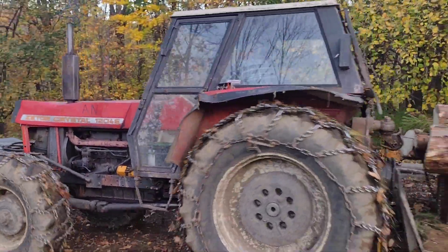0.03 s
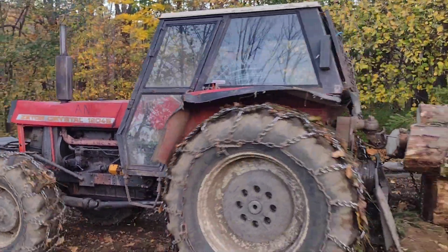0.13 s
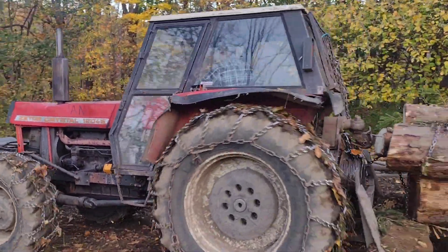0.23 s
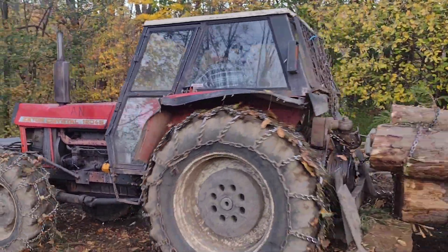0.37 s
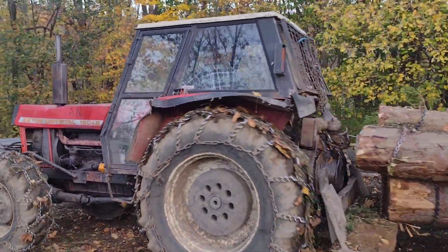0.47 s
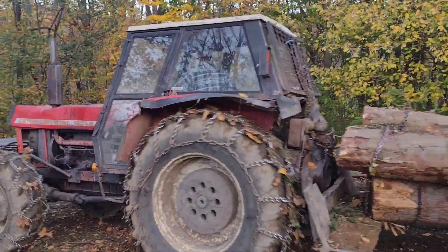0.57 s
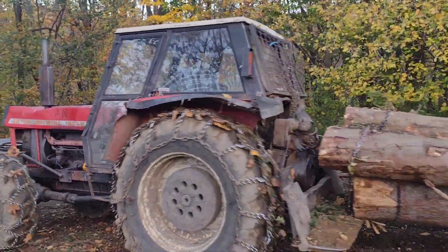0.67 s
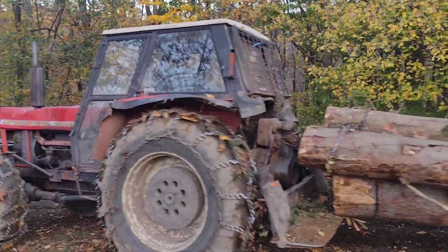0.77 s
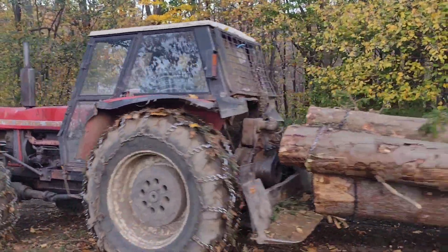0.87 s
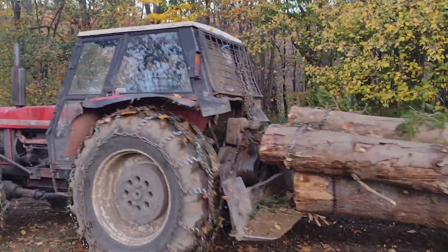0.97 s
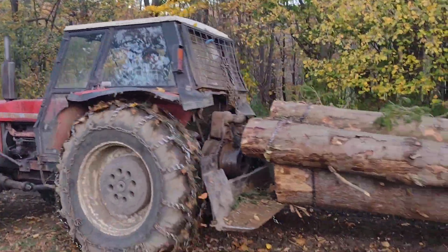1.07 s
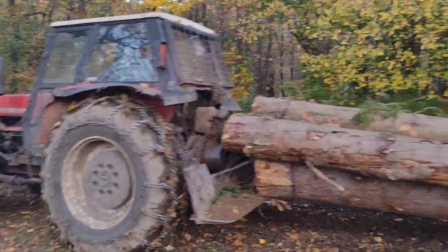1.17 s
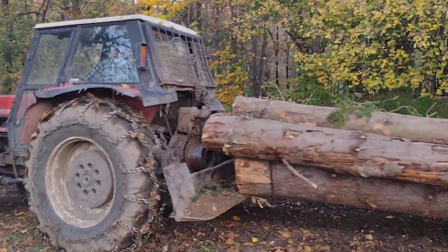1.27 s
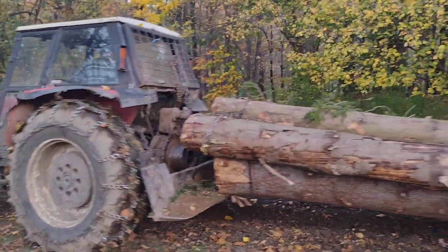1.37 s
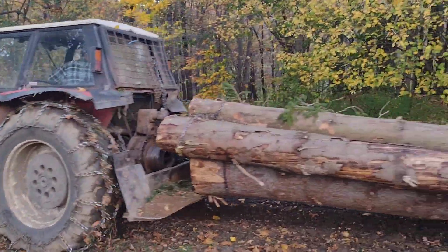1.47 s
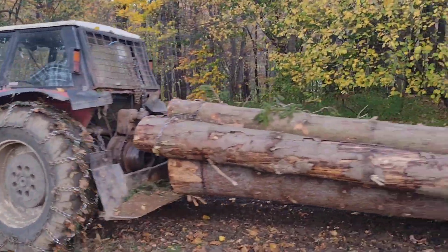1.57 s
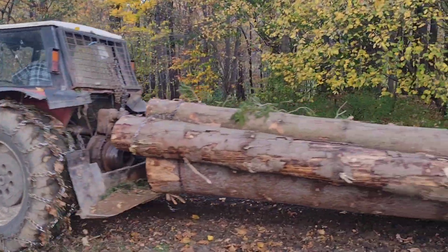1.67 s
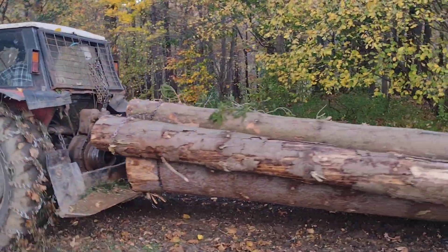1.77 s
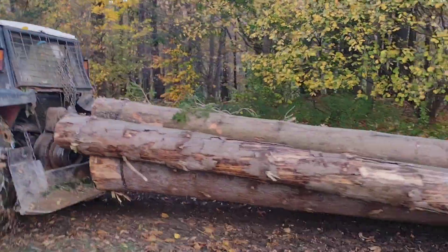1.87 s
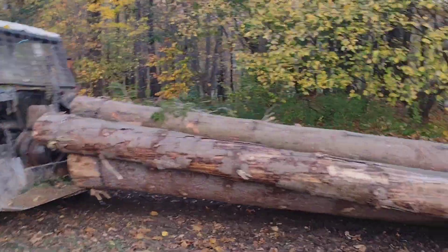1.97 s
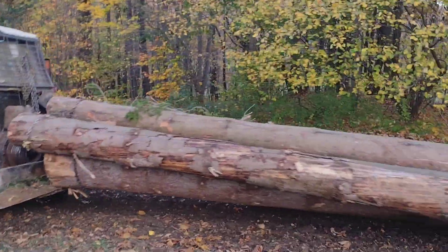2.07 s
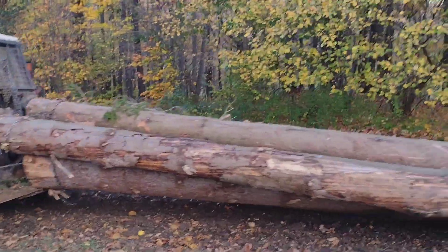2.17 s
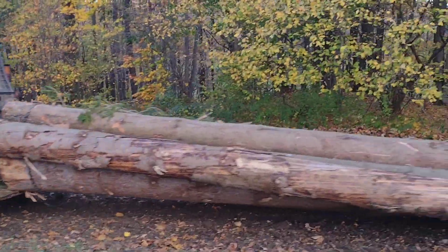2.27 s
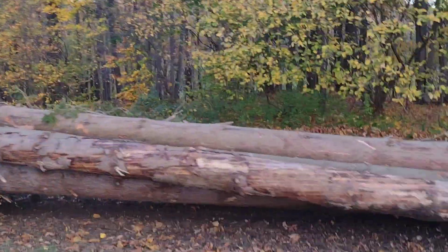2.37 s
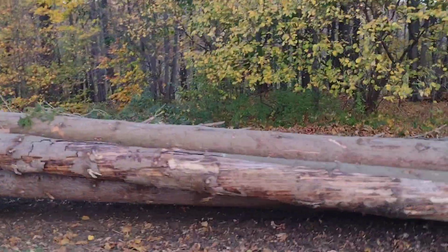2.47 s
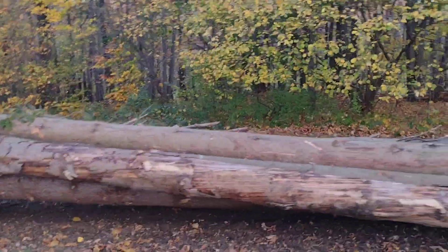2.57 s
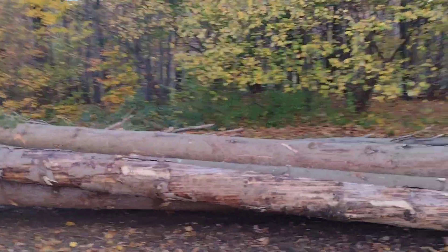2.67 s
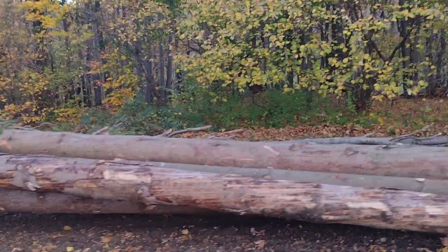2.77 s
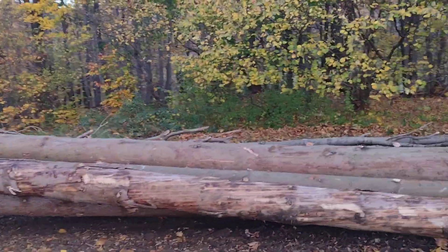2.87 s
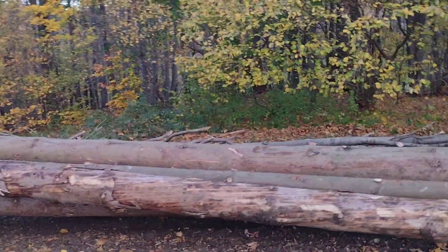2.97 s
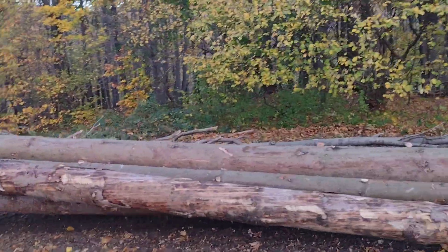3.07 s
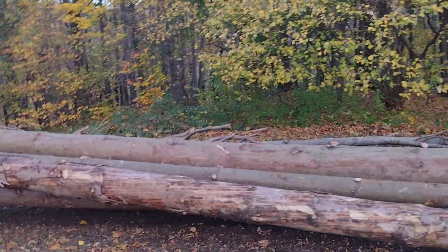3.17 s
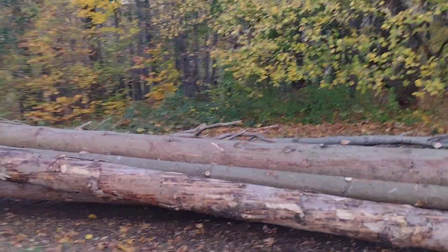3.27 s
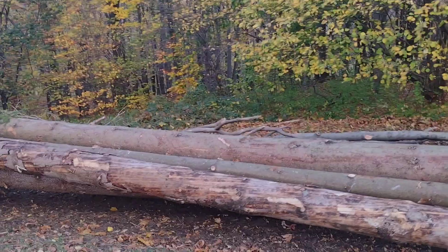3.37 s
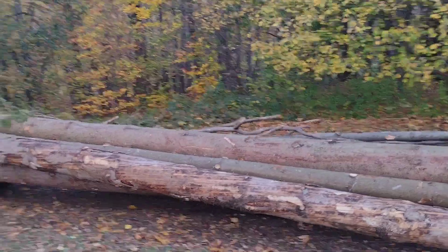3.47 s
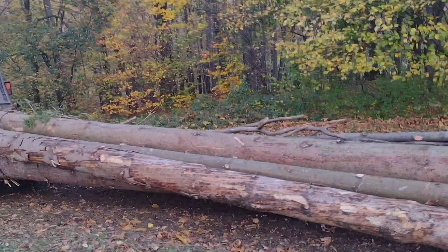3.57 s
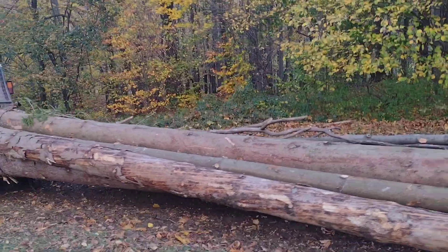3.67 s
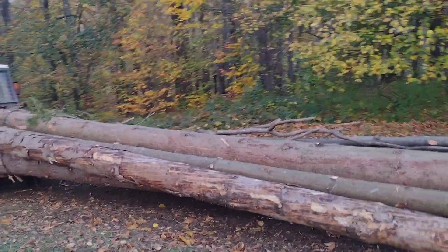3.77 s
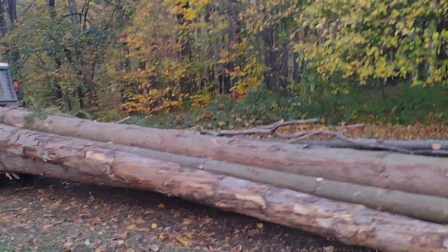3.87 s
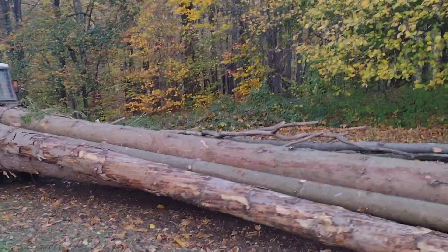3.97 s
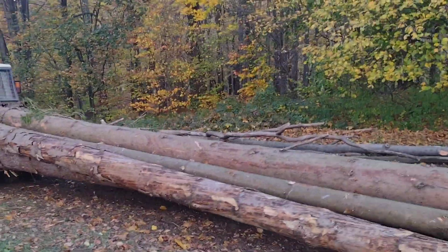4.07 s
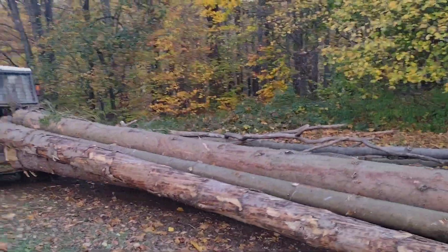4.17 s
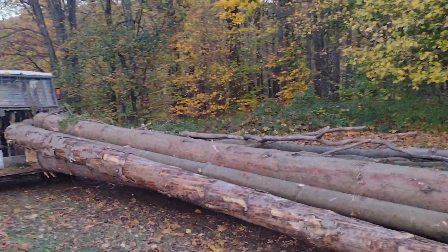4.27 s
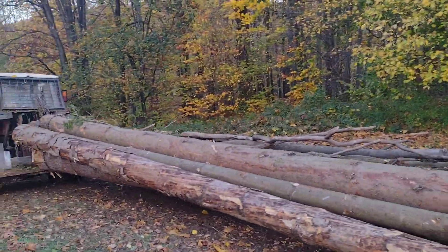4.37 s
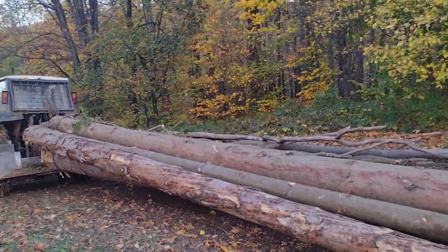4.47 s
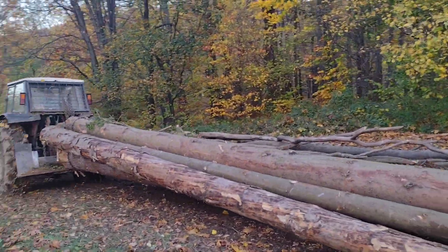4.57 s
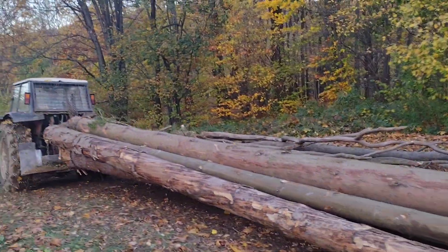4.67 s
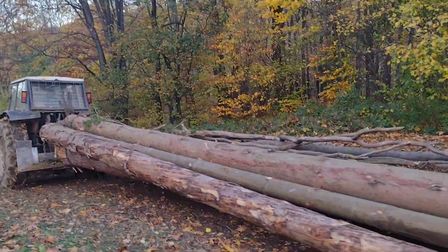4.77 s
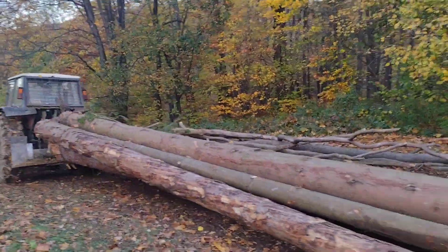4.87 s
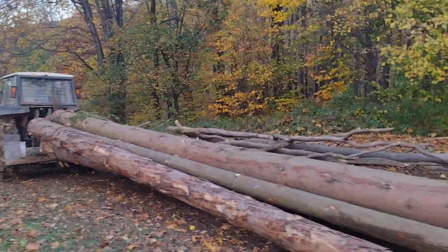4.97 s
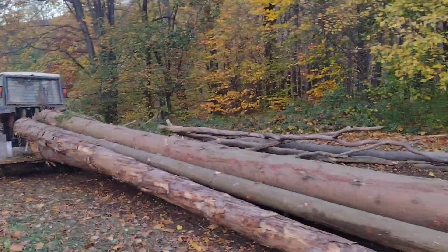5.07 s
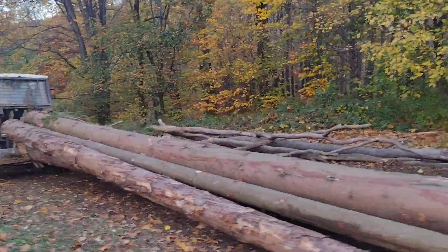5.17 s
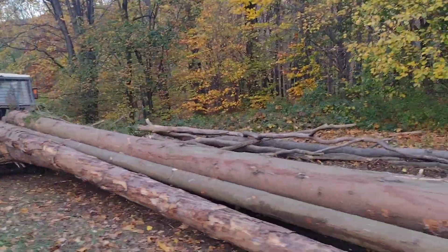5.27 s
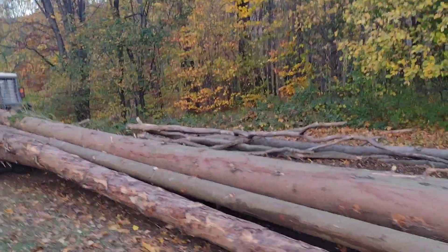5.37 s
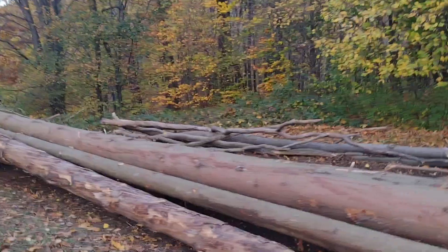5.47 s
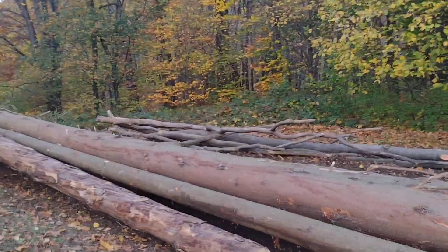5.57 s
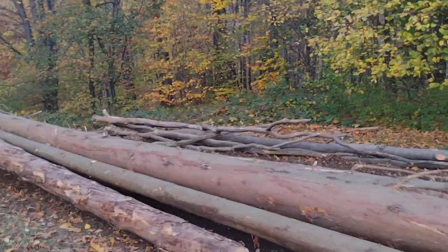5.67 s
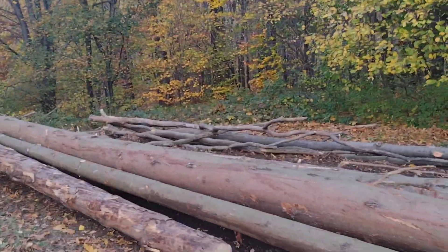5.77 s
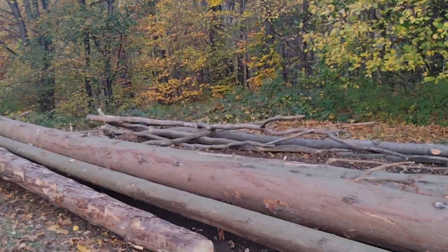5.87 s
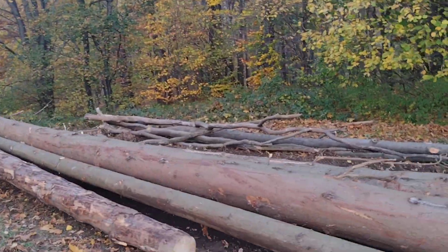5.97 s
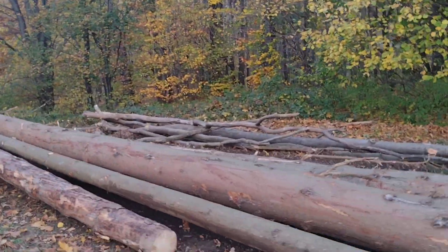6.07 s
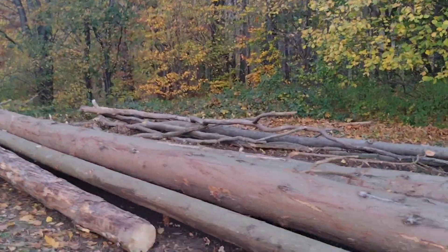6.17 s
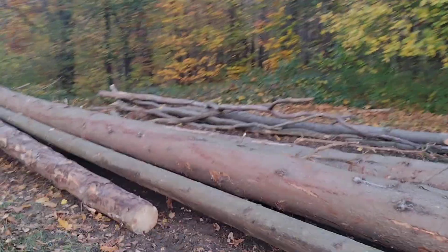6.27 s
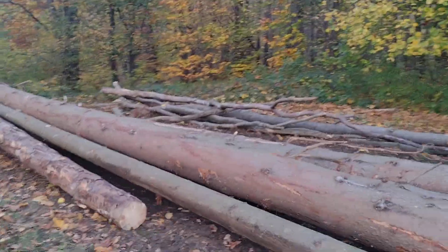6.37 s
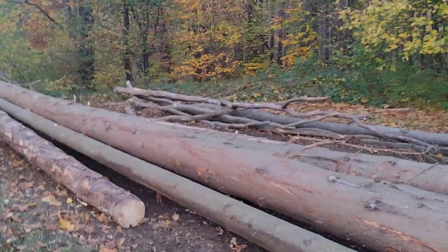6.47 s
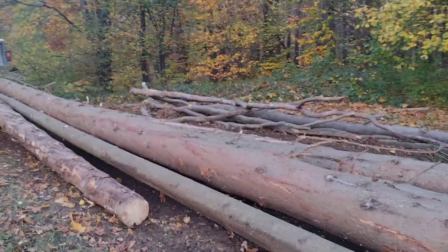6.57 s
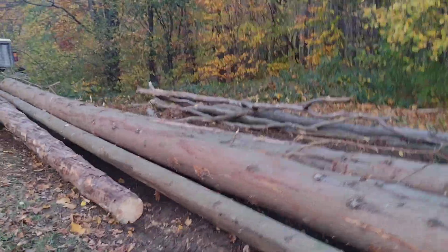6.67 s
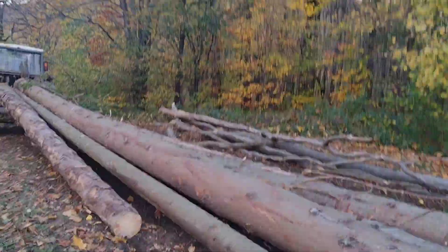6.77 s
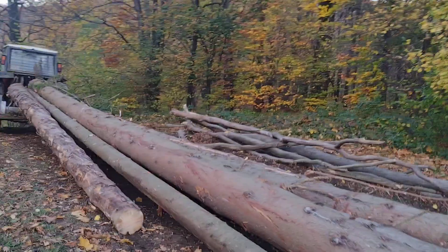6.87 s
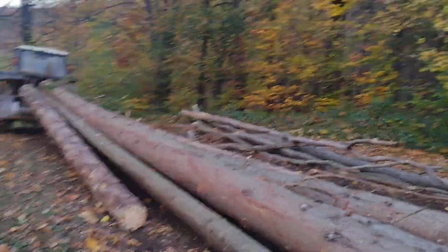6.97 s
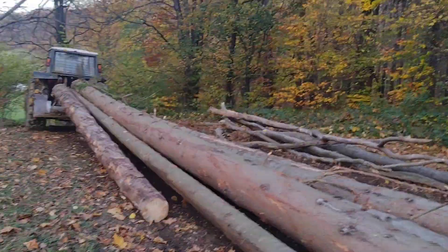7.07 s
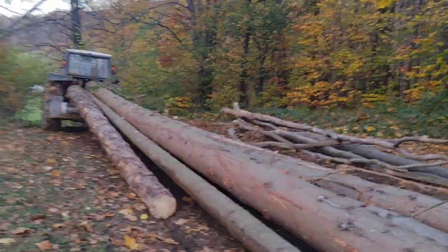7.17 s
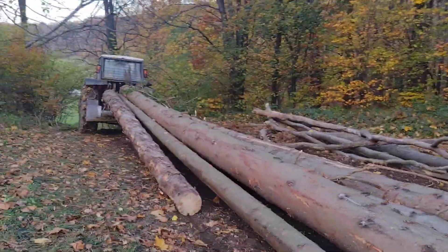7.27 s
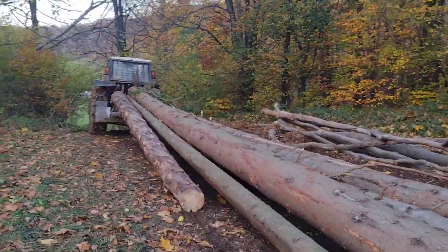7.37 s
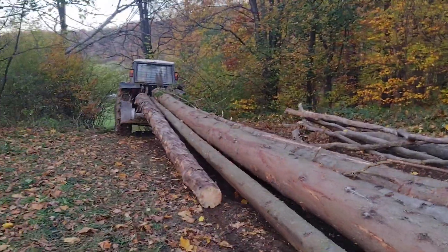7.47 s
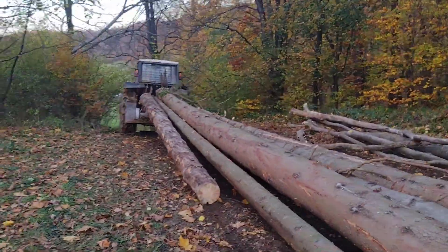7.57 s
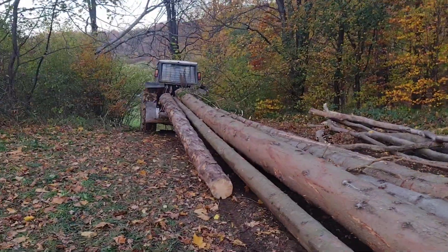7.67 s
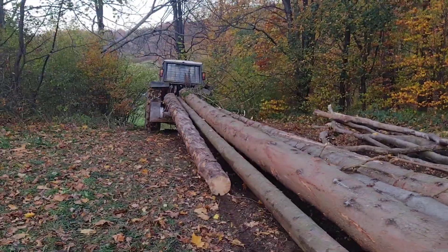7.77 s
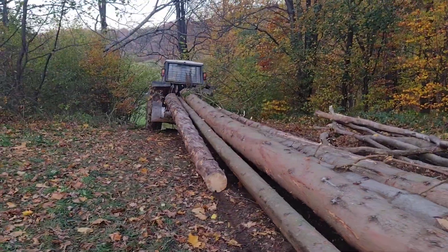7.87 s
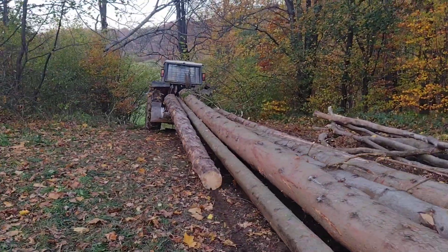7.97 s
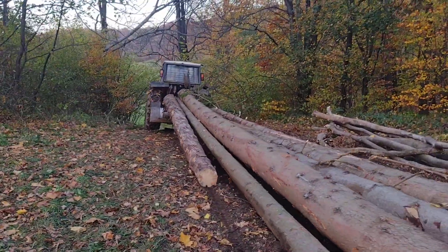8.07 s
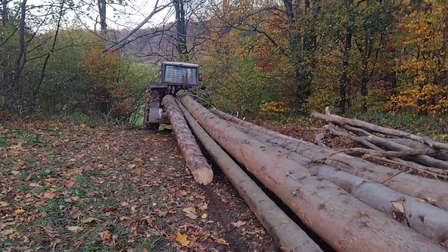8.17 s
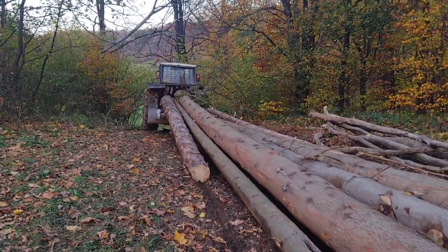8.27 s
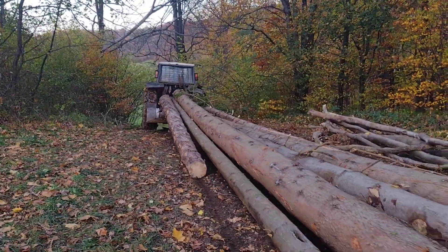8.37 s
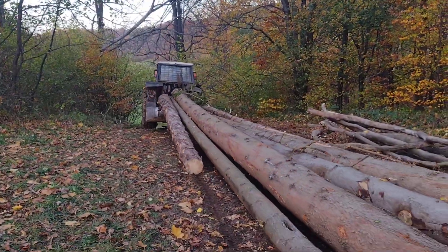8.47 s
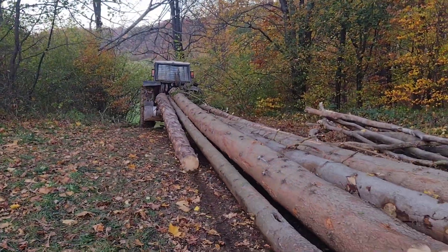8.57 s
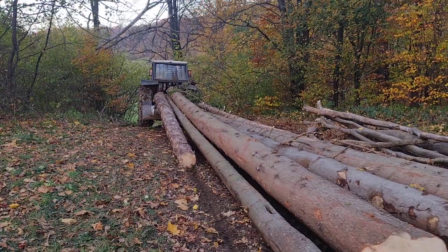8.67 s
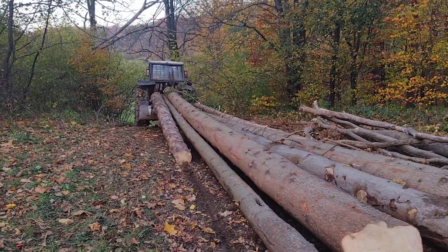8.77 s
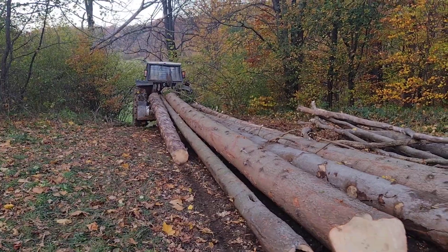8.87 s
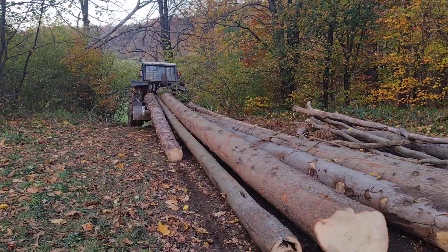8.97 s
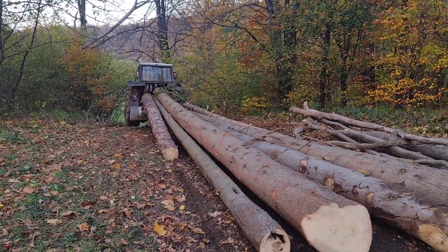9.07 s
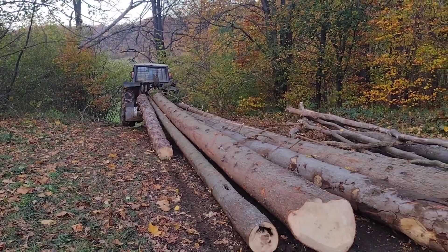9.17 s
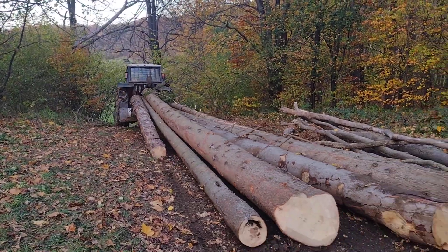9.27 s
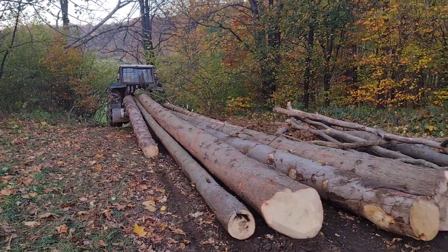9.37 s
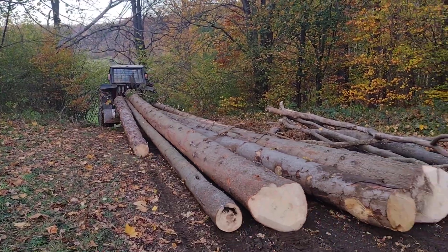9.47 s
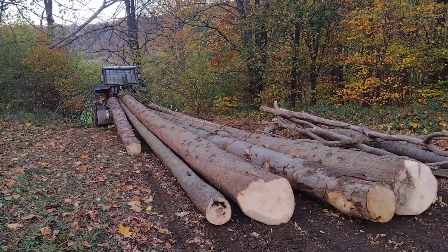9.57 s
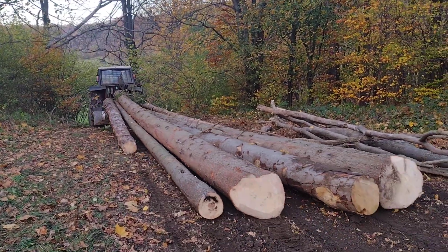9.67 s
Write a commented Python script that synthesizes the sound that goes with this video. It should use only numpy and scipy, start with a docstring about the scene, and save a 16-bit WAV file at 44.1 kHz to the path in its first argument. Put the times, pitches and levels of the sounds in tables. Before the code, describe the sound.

A diesel tractor idles close by on a forest track, a low throbbing hum with knocking, metallic ticking and a raspy clatter. Its speed settles slightly over the first two seconds, and the clatter is brightest from about 1 to 3.5 seconds. The microphone is carried away on foot, so the engine gradually gets fainter and more blurred, running until the end at nearly 10 seconds. It sags a little between 5 and 7 seconds, then recovers.

From about 2 seconds, light, uneven footsteps brush dry leaves. Small twigs snap at around 3 seconds and several times between 4 and 6.3. Loose steel clinks occasionally, mostly in the first four seconds. A small metal piece jingles briefly near the microphone at about 0.3, 4.6, 6.7 and 8.4 seconds. A very faint whine dips and rises between 5 and 6 seconds.

```python
"""The hum and knock of an idling six-cylinder diesel tractor, heard close by on a forest track. The exhaust
radiates at the firing rate; each firing excites the block, thin metal and a rasp. The listener walks back along
a load of logs: the engine fades and blurs with distance, while wheel, cab and logs hide and uncover its treble.
Shoes brush dry leaves, twigs snap, a small metal piece jingles close by, single clinks of steel ring out, and a
faint whine passes once."""
import sys
import numpy as np
from scipy import signal
from scipy.fft import rfft, irfft, next_fast_len
from scipy.io import wavfile
from scipy.ndimage import uniform_filter1d, map_coordinates

SR = 44100
rng = np.random.default_rng(int(sys.argv[2]) if len(sys.argv) > 2 else 0)


def wav_record(signal):
    """Record a signal, one row per channel, as 16-bit PCM in the file named by sys.argv[1]."""
    frames = np.transpose(np.atleast_2d(signal))
    bounded = np.clip(frames, -1, 1)
    # unit amplitude maps onto the largest positive 16-bit level
    quanta = np.round(bounded * 32767).astype(np.int16)
    wavfile.write(sys.argv[1], SR, quanta)


N = 429093

# the six cylinders in firing order: (relative burst level [dB])
CYLINDER_DB = [-.4, -4.5, .3, -5.3, -.4, -3.3]


def amp(db):
    """Amplitude ratio of a level in decibels."""
    return 10 ** (np.asarray(db) / 20)


def unit(x):
    """Normalisation to rms 1."""
    return x / np.sqrt(np.mean(x ** 2) + 1e-20)


def along(points, hz):
    """Interpolation of (frequency [Hz], value) points on a logarithmic axis."""
    frequencies, values = np.transpose(points)
    return np.interp(np.log(hz + 1), np.log(frequencies + 1), values)


def curves(rows):
    """Linear interpolation: one value per sample for each column after the time."""
    times, *columns = np.transpose(rows)
    return [np.interp(np.arange(N) / SR, times, column) for column in columns]


def wobble(rate):
    """Smooth random modulation: a spline through `rate` Gaussian knots a second."""
    knots = rng.standard_normal(int(N * rate / SR) + 4)
    coarse = np.arange(0, N + 64, 64)
    return np.interp(np.arange(N), coarse, map_coordinates(knots, [coarse * rate / SR]))


def filtered(x, response):
    """Linear filtering: the spectrum of x times a frequency response."""
    size = next_fast_len(N + 8192)
    return irfft(rfft(x, size) * response(np.fft.rfftfreq(size, 1 / SR)), size)[..., :N]


def rush(spectrum, drive=1, repeated=0):
    """Source and filter: driven noise, plus any repeated pattern, shaped by a spectrum; stereo, rms 1."""
    # likeness of left and right: (frequency [Hz], coherence [0-1])
    coherence = [(60, 0.74), (150, .995), (350, 0.92), (700, 0.78), (1400, 0.71), (3000, 0.14),
                 (10000, 0.1)]

    def response(hz):
        angle = np.arccos(np.clip(along(coherence, hz), 0, 1)) / 2
        return amp(along(spectrum, hz)) * np.array([np.cos(angle), np.sin(angle)])
    excitation = rng.standard_normal((2, N)) + np.array([[1], [0]]) * repeated
    mid, side = filtered(drive * excitation, response)
    return unit(np.array([mid + side, mid - side]))


def spreading_db(start_db, fall_db):
    """Spreading loss: the level drops by fall_db at each doubling of the walker's distance."""
    start_m, walk_m_per_s = 2.86, 1.346
    distance_m = start_m + walk_m_per_s * np.arange(N) / SR
    return start_db - fall_db * np.log2(distance_m / start_m)


def scattered(pulses, share):
    """Scattering: a share of the power arrives in pulses; trees spread the rest into an even wash."""
    share = np.clip(share, 0, 1)
    return np.sqrt(share * pulses ** 2 + 1 - share)


def interference(pair, depth_db):
    """Interference of ground and trunk echoes: spectral peaks and hollows drift as the listener walks."""
    spectra = signal.stft(pair, nperseg=512)[2]
    ripple = uniform_filter1d(rng.standard_normal(spectra.shape[1:]), size=3, axis=0)  # over frequency
    ripple = uniform_filter1d(ripple, size=50, axis=1)  # over time
    return signal.istft(spectra * amp(depth_db * unit(ripple)), nperseg=512)[1][:, :N]


def placed(pair, direct):
    """Time and level cues: the left leads, less so for diffuse sound; the treble favours the right."""
    # bearing of the tractor: (time [s], left lead of fully direct sound [ms])
    bearing = [(0, 0.3), (1.7, 0.57), (4, 0.55), (6.6, 0.53), (7.2, 0.39), (7.7, 0.15), (9.73, 0.12)]
    # stereo balance: (frequency [Hz], left minus right [dB])
    balance = [(60, 0.5), (700, -0.5), (1400, -2), (2800, -5), (4500, -4), (5800, -11.5), (7500, -2),
               (12000, -1)]
    lead = direct * curves(bearing)[0] * SR / 1000
    left = map_coordinates(pair[0], [np.arange(N) + lead], mode="mirror")
    sides = np.array([[.5], [-.5]])
    return filtered(np.array([left, pair[1]]), lambda hz: amp(along(balance, hz) * sides))


def whine():
    """Frequency modulation: a faint, unsteady tone sags and rises under the engine."""
    # course of the tone: (time [s], frequency [Hz], level [dB])
    glide = [(4.8, 572, -68), (5.05, 566, -51), (5.3, 555, -50), (5.55, 520, -55), (5.8, 535, -51),
             (6.05, 567, -53), (6.3, 575, -70)]
    hz, db = curves(glide)
    t = np.arange(N) / SR
    sounding = (t > glide[0][0]) & (t < glide[-1][0])
    tone = np.sqrt(2) * np.sin(2 * np.pi * np.cumsum(hz) / SR)
    return sounding * amp(db + 1.7 * wobble(8.5)) * tone


def clinks():
    """Damped free vibration: bits of steel, on the tractor or close by, ring one short note at each tap."""
    # taps: (time [s], frequency [Hz], level [dB], t60 [s])
    taps = [(.245, 10020, -29, 0.22), (.298, 10200, -31, 0.13), (1.055, 10750, -23.5, 0.071),
            (2.367, 3100, -19, 0.041), (2.9, 9950, -26, 0.12), (3.832, 6760, -20, 0.058),
            (6.198, 7150, -32, .07)]
    out, t = np.zeros(N + SR), np.arange(SR // 4) / SR
    attack = 1 - np.exp(-t / 0.00059)
    for start, hz, db, t60 in taps:
        ring = amp(db - 60 * t / t60) * np.sin(2 * np.pi * hz * t)
        out[round(start * SR):][:len(t)] += ring * attack
    return out[:N]


def footsteps():
    """Friction and impact: shoes brush dry leaves and crunch the litter; a firm heel adds a knock."""
    # steps: (peak time [s], level [dB], half length [s], crunch re leaves [dB], heel re leaves [dB])
    steps = [(1.822, -25.5, 0.055, -24, -26), (3.068, -29, 0.042, -20, -8), (3.65, -34, 0.071, -16, -6),
             (4.238, -35, 0.0048, -5, 12.5), (4.275, -39, .05, -8, 0), (4.357, -38, 0.0073, -5, -3),
             (5.294, -37, 0.075, -7, -7.5), (6.135, -35.5, 0.02, -19, -22), (6.852, -28, 0.014, -17, -17),
             (7.32, -43, 0.026, -4, -16), (7.858, -34, 0.05, -5.5, -22), (7.905, -45, .015, -18, -25),
             (9.345, -48, 0.044, -12, -9)]
    # spectra of leaves, packed litter and a heel on wood and soil: (frequency [Hz], relative level [dB])
    leaves = [(300, -38), (1300, -26), (1900, -15.5), (4500, 3), (6000, -6.5), (9000, 10), (10500, 4),
              (12000, -6), (15800, -11)]
    litter = [(400, -22), (1300, -12), (1850, -2.5), (3000, -2), (4100, -7), (5500, -12), (9000, -26)]
    heel = [(60, -2), (300, 1), (520, -15), (700, -5), (880, 3.5), (1120, -11), (1550, -12), (2230, -7.5),
            (2800, -16), (6000, -16), (10000, -38)]
    t = np.arange(N) / SR
    brush, crunch, thud = np.zeros((3, N))
    for peak, db, length, crunch_db, thud_db in steps:
        spread = length * np.where(t < peak, .7, 1.2)  # the shoe lands faster than the leaves settle
        press = amp(db) * np.exp(-.5 * ((t - peak) / spread) ** 2)
        brush += press
        crunch += amp(crunch_db) * press
        thud += amp(thud_db) * press
    crackle = amp(4.4 * wobble(700))
    return brush * rush(leaves, crackle) + crunch * rush(litter, crackle) + thud * rush(heel)


def snaps():
    """Brittle fracture: a few twigs and many faint leaf stalks break in brief bursts of noise."""
    # twigs underfoot: (time [s], level [dB], t60 [s])
    twigs = [(3.127, -15, .02), (4.156, -33, .03), (4.2314, -29, .025), (4.279, -32, .015),
             (4.484, -35, .012), (4.5177, -20, 0.026), (5.218, -24, .05), (5.445, -30, .02),
             (6.091, -24, 0.018), (6.132, -29, .02), (6.143, -25, .025), (6.274, -32, .015)]
    # spectrum of a break: (frequency [Hz], relative level [dB])
    fracture = [(500, -30), (2000, -13), (6000, -9), (9000, 11), (11000, 0), (13000, -13), (15800, -16)]
    stalk_span_s, stalk_db, stalk_range_db, stalk_t60 = (3, 8.6), -36.5, 21, .01
    stalks = [(np.interp(when, [0, 1], stalk_span_s), stalk_db - stalk_range_db * faintness, stalk_t60)
              for when, faintness in rng.random((60, 2))]
    envelope, t = np.zeros(N + SR), np.arange(SR // 10) / SR
    for start, db, t60 in twigs + stalks:
        envelope[round(start * SR):][:len(t)] += amp(db - 60 * t / t60)
    return envelope[:N] * rush(fracture)


def jingles():
    """Modal vibration: each touch clicks and rings two clusters of modes, which rattling broadens."""
    # touches: (time [s], level [dB], upper cluster re lower [dB], ring length [ratio])
    touches = [(.272, -34, -13, 0.81), (.298, -29.5, -1, 0.64), (2.22, -40, -22, 1.6),
               (4.611, -29.5, 6, 0.68), (4.632, -37, -6, .8), (4.97, -52, -10, .8), (5.56, -46, -6, 1),
               (6.51, -41, -10, 0.55), (6.666, -28, -9, 1), (6.713, -32, -10, 0.84), (6.761, -38, -2, 0.7),
               (6.98, -46, -14, .8), (8.345, -45, -18, 0.62), (8.384, -38, -1, 0.55),
               (8.397, -40.5, -4, 0.55), (8.701, -46, -6, 1), (8.85, -50, -8, 1.1)]
    # modes of the small metal piece: (frequency [Hz], relative level [dB], base t60 [s])
    modes = [(6510, -7.5, 0.21), (6560, 5.5, 0.11), (6970, 5.5, 0.28), (7200, -3, 0.15), (7280, -5, 0.57),
             (7700, -12, 0.12), (12640, 1.5, 0.14), (12820, -1, .13), (13000, -11, .16), (14100, -14, .2),
             (14770, -23, .12)]
    click_db, click_t60, relative_linewidth = 2, .006, .002
    out, t = np.zeros(N + SR), np.arange(SR // 2) / SR
    attack = 1 - np.exp(-t / 0.0014)
    for start, db, upper_db, length in touches:
        ring = amp(db + upper_db + click_db - 60 * t / click_t60) * rng.standard_normal(len(t))
        for hz, mode_db, t60 in modes:
            level_db = db + mode_db + (hz > 10000) * upper_db + rng.normal(0, 2)
            phase_step = np.sqrt(2 * np.pi * relative_linewidth * hz / SR)
            stray = phase_step * np.cumsum(rng.standard_normal(len(t)))
            phase = 2 * np.pi * hz * t + stray + rng.uniform(0, 2 * np.pi)
            ring += amp(level_db - 60 * t / (t60 * length)) * np.sin(phase) * attack
        out[round(start * SR):][:len(t)] += ring
    return out[:N]


def bursts(firings, width, scatter_db):
    """Pulsed excitation of rms 1: a swell per firing, sized by its cylinder; width in firing periods."""
    crank = firings + .52
    stroke, offset = np.floor(crank).astype(int), crank % 1 - .5
    chance = rng.uniform(-1, 1, 1000)
    size = amp(np.array(CYLINDER_DB)[stroke % len(CYLINDER_DB)] + scatter_db * chance[stroke])
    spread = width * np.where(offset < 0, .65, 1)  # rises faster than it dies
    return unit(size / (1 + (offset / spread) ** 2))


def ticks(firings):
    """Directivity: firings ring thin metal; each ring swells and glides as the walker crosses its beam."""
    # rings: (frequency [Hz], relative level [dB], crossing time [s], half crossing [s], drift [Hz/s])
    rings = [(4800, 2.5, 1.1, .45, -600), (3950, 1, 1.4, .35, -700), (7800, 5, 1, .33, -400),
             (6900, 3, 1.1, .35, -600), (8850, 7, 1.75, .3, -1500), (3700, 4, 2.45, .25, 0),
             (5150, 5, 2.48, .25, 0), (2800, -3, 2.6, .3, 0), (7550, 5.5, 2.7, .25, 0),
             (10000, -.5, 2.7, .4, 0), (3750, -1, 3.2, .3, 0), (5200, -1, 3.3, .3, 0),
             (8300, 5.5, 3.28, .25, 1500)]
    off_beam_db, blur_rad, hardness = -16.5, 2.6, 1.35  # hardness > 1: strong firings tick far harder
    t, ringing = np.arange(N) / SR, np.zeros(N)
    for hz, db, crossing_s, half_s, drift in rings:
        beam = np.exp(-.5 * ((t - crossing_s) / half_s) ** 2) + amp(off_beam_db)
        pitch = hz + drift * np.clip(t - crossing_s, -2 * half_s, 2 * half_s)
        phase = 2 * np.pi * np.cumsum(pitch) / SR + blur_rad * wobble(520)
        ringing += beam * amp(db + 1.8 * wobble(60)) * np.sin(phase)
    return unit(ringing * bursts(firings, width=0.19, scatter_db=1.5) ** hardness)


def clatter(drive, station):
    """Acoustic shadow: the engine's clatter changes colour as the cab comes to hide it."""
    # clatter in the open and behind the cab: (frequency [Hz], relative level [dB])
    in_view = [(1100, -60), (1500, 2), (1640, 5.5), (1830, -0.5), (2100, 9), (2400, 1.5), (2900, 4.5),
               (3400, -2), (4000, -11.5), (4800, 3), (5300, -2.5), (5900, -6), (6800, -7), (8000, -15),
               (11000, -60)]
    behind_cab = [(1000, -52), (1480, -5), (1650, 1), (1850, 0), (2120, 5), (2450, 3), (2850, 4),
                  (3300, -0.5), (4000, 1), (4750, 0), (5200, -10), (5800, -24.5), (6800, 0.5), (8000, -3),
                  (11000, -62)]
    hidden = np.minimum(station, 1)
    return np.sqrt(1 - hidden) * rush(in_view, drive) + np.sqrt(hidden) * rush(behind_cab, drive)


def rasp(drive):
    """Amplitude-modulated noise: each firing spits a bright hiss."""
    # spectrum of the hiss: (frequency [Hz], relative level [dB])
    hiss = [(2000, -20), (3200, -3), (5000, -3.5), (6000, -4), (7200, -2.5), (8700, 2), (10000, -1.5),
            (11500, -10), (13500, -16.5), (15800, -41)]
    return rush(hiss, drive)


def block(firings, station):
    """Forced vibration: the block knocks partly alike in every cycle; cab and logs recolour the sound."""
    # the knock at the four stations: (frequency [Hz], relative level [dB])
    beside = [(25, -16), (60, 12.5), (140, 3.5), (250, 0), (350, -2.5), (410, -8), (460, 4.5), (520, 2.5),
              (635, 9), (800, 1), (920, -2), (1200, 3), (1500, -6.5), (2300, -25.5)]
    behind = [(25, -6), (60, 2), (130, -0.5), (190, -4.5), (280, -1), (330, -2), (420, -1), (510, -9),
              (570, -6.5), (645, 0.5), (740, -2.5), (840, -1.5), (960, -6.5), (1080, -9), (1400, -9.5),
              (2300, -29)]
    by_logs = [(25, -3), (60, 9.5), (130, 2), (190, -1.5), (250, -3), (320, -2), (380, -1), (450, -11),
               (550, -4.5), (630, -4), (780, -1), (950, -12), (1150, -6), (1400, -9), (2300, -31.5)]
    far_behind = [(25, 6), (60, 10), (130, 8.5), (200, 4), (260, 6), (340, -4), (400, -1.5), (460, -0.5),
                  (540, 2.5), (720, -6), (1000, -2.5), (1250, -11.5), (1500, -9), (2300, -28)]
    pattern = rng.standard_normal(2048)
    pattern -= pattern.mean()
    cycle = firings / len(CYLINDER_DB) % 1
    repeated = 0.37 * np.interp(cycle * len(pattern), np.arange(len(pattern)), pattern)
    thump = scattered(bursts(firings, width=0.32, scatter_db=13), share=0.053)
    out = np.zeros((2, N))
    for place, spectrum in enumerate([beside, behind, by_logs, far_behind]):
        power_share = np.clip(1 - abs(station - place), 0, 1)
        out += np.sqrt(power_share) * rush(spectrum, thump, repeated)
    return amp(0.5 * station) * out  # far off, the bass carries best


def exhaust(firings, station):
    """Harmonic series: the silencer passes three firing harmonics; a weak cylinder adds a throb."""
    # the hum: (time [s], firing tone [dB], octave [dB], other orders [dB])
    hum_levels = [(0, -17, -32, -35), (.5, -16.5, -24, -37.5), (1, -16, -35, -38), (1.6, -15.5, -31.5, -34),
                  (2.8, -14, -37, -39), (3.17, -16.5, -37, -40.5), (3.35, -15, -49, -38.5),
                  (4.2, -18.3, -39, -39), (4.6, -20.5, -49, -40.5), (5.6, -21, -43.5, -39),
                  (6.9, -21.5, -36, -40), (7.15, -22, -43.5, -45), (8.7, -24, -43.5, -43),
                  (9.73, -28.5, -52, -52)]
    # third harmonic: (time [s], level [dB])
    third_levels = [(0, -47), (.7, -39.5), (1.4, -49), (2.8, -45.5), (3.7, -50), (4.3, -59), (5.5, -57),
                    (6.2, -42), (6.75, -37.5), (7.2, -41), (7.8, -42), (8.7, -50), (9.2, -59), (9.73, -62)]
    # engine orders; 6 is the firing tone, fractional ones are belt-driven:
    # (order [per four-stroke cycle], relative level beside [dB], behind [dB], by logs [dB], far [dB])
    orders = [(3, -11, -17, -19, -21), (4, -6, -3, -6, -9), (5, -19, -7, -8, -9), (7, -2, -4, -4.5, -.5),
              (8, -8, -4, -7, -2), (9, -1, -.5, 4, 2), (10, -3, -10.5, -4, -10), (11, -8, -9.5, -11, -8),
              (14, -12, -14, -16, -11), (15, -8, -8, -13, -11), (16, -14, -13, -10, -8),
              (16.5, -18, -20, -13, -8), (19, -16, -18, -13, -6.5), (20, -18, -24, -14, -12),
              (21.75, -12, -13, -18, -24), (24, -12, -10, -18, -25), (25.4, -12, -16, -16, -18),
              (28, -12, -13, -24, -26), (30, -12, -14, -24, -28), (32, -13, -12, -24, -28),
              (32.9, -12, -18, -11.5, -17), (38, -14, -5, -19, -24), (44, -22, -22, -22, -15)]
    lead_strokes, weak_stroke = .18, 2
    tone_db, octave_db, throb_db = curves(hum_levels)
    strokes = firings + lead_strokes
    phase = 2 * np.pi * strokes
    echo_lag = np.pi / 2 * np.minimum(station, 2)  # the ground echo delays the octave
    tone = amp(tone_db + 0.21 * wobble(7.6)) * np.cos(phase)
    octave = amp(octave_db) * np.cos(2 * phase - echo_lag)
    third = amp(curves(third_levels)[0] + wobble(5)) * np.cos(3 * phase)
    cycles = (strokes - weak_stroke) / len(CYLINDER_DB)
    throb = np.zeros(N)
    for order, *station_db in orders:
        dips = order > 4 and order % 3 > 0  # inverted to dip on the weak stroke
        drifts = order > 12
        shift = np.pi * dips + drifts * (rng.uniform(0, 2 * np.pi) + 0.34 * wobble(4))
        db = np.interp(station, np.arange(len(station_db)), station_db)
        flicker_db = (0.6 + 2.3 * drifts) * wobble(3.09)
        throb += amp(db + flicker_db) * np.cos(2 * np.pi * order * cycles + shift)
    return np.sqrt(2) * (tone + octave + third + amp(throb_db) * throb)


def tractor():
    """Synchronous excitation: one crankshaft times every engine layer, and all fade with distance."""
    # idle speed: (time [s], firing rate [Hz])
    idle = [(0.0, 74.34), (0.43, 69.08), (1.12, 65.38), (1.71, 63.94), (2.82, 66.0), (3.07, 63.78),
            (3.25, 66.27), (4.24, 67.16), (4.79, 62.66), (5.8, 60.44), (6.92, 60.14), (7.17, 63.38),
            (7.6, 61.63), (8.08, 63.38), (8.62, 62.3), (9.21, 66.96), (9.73, 66.62)]
    # the walk: (time [s], station [0 beside, 1 behind, 2 by the logs, 3 far behind], knock shading [dB])
    walk = [(0, 0.068, -1.5), (.27, 0.023, 3), (.6, 0.18, 1), (1.15, 0.48, 0.3), (1.75, 0.86, 1),
            (2.25, .95, 0), (2.7, 0.95, -1.5), (3.6, 1.3, -0.8), (4.2, 1.4, 0.1), (4.8, 1.77, 0),
            (6.8, 2.14, 2.3), (7.5, 2.9, 2), (9.73, 2.9, 1.2)]
    # screening by wheel, cab and logs: (time [s], clatter and ticks [dB], rasp [dB], sharpness [0-1])
    screening = [(0, -1, 2, 0.8), (.6, -1.2, -0.5, 0.54), (1.1, 2.5, 2.5, 0.43), (1.75, 2, 7, 0.85),
                 (2.1, 4, 5.5, 0.66), (2.5, 4, 6.5, 0.68), (2.9, 2.5, 5.5, 0.65), (3.35, 1.5, 6, 0.74),
                 (4.1, 1, 0.5, 0.26), (5, 0, 0.5, 0.27), (6.4, 2.3, 2.5, 0.5), (7.5, -0.5, 1.5, 0.04),
                 (8.3, -1, 0, 0.14), (9.1, -2, -3.5, 0.2), (9.73, -3, -5.5, 0)]
    firings = np.cumsum(curves(idle)[0]) / SR
    station, shade_db = curves(walk)
    treble_db, top_db, sharpness = curves(screening)
    knock = amp(spreading_db(-22.5, fall_db=8) + shade_db) * block(firings, station)
    spit = bursts(firings, width=0.19, scatter_db=2.2)
    clattering = clatter(scattered(spit, share=0.33 * sharpness), station)
    clatter_db = spreading_db(-27, fall_db=7) + treble_db + .5 * wobble(11)
    rasp_db = spreading_db(-27.5, fall_db=7.5) + top_db + 1.8 * wobble(9.6)
    rasping = rasp(scattered(spit, share=0.69 * sharpness))
    ticking = amp(spreading_db(-27, fall_db=6) + treble_db) * sharpness * ticks(firings)
    low = exhaust(firings, station) + interference(knock, depth_db=1.46)
    high = interference(amp(clatter_db) * clattering + amp(rasp_db) * rasping, depth_db=2) + ticking
    return placed(low, direct=0.57) + placed(high, direct=0.8896)


def scene():
    """Superposition of the tractor and the walker's own small sounds close by."""
    slightly_left = amp([[0.5], [-0.5]])
    return tractor() + whine() + clinks() + footsteps() + snaps() + jingles() * slightly_left


def record(dry):
    """Band limiting: an ideal low-pass filter removes the highest treble."""
    return filtered(dry, lambda hz: hz < 15800)


dry = scene()
out = record(dry)
wav_record(out)
```